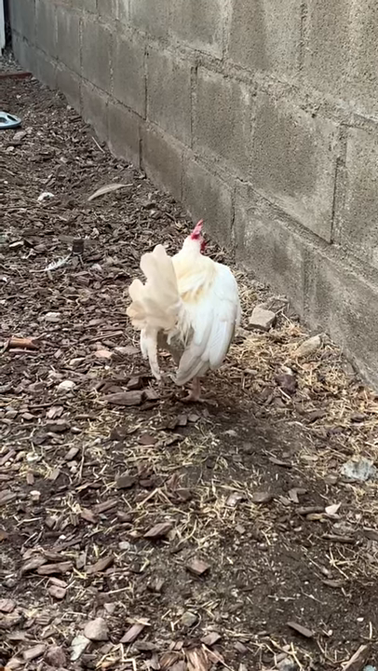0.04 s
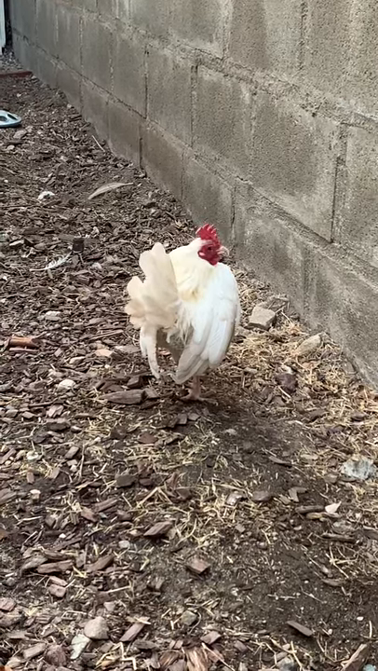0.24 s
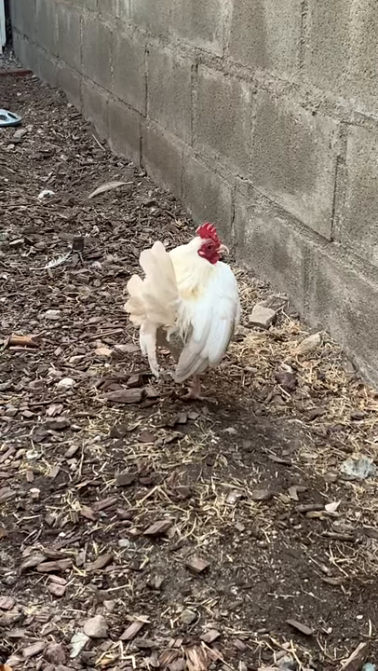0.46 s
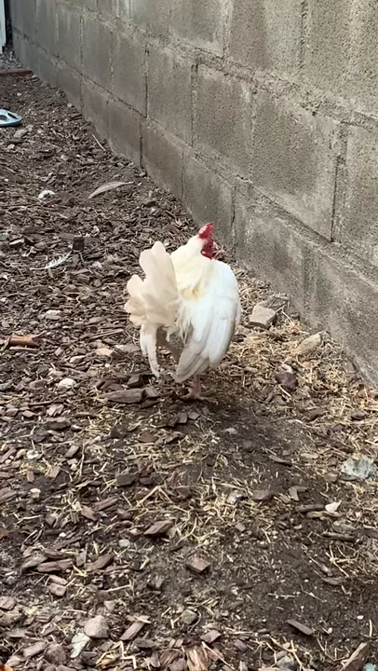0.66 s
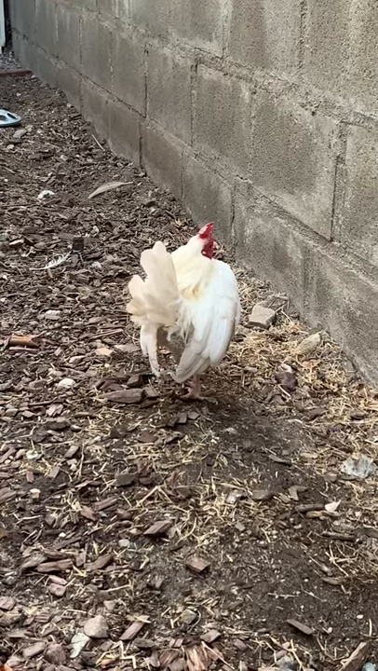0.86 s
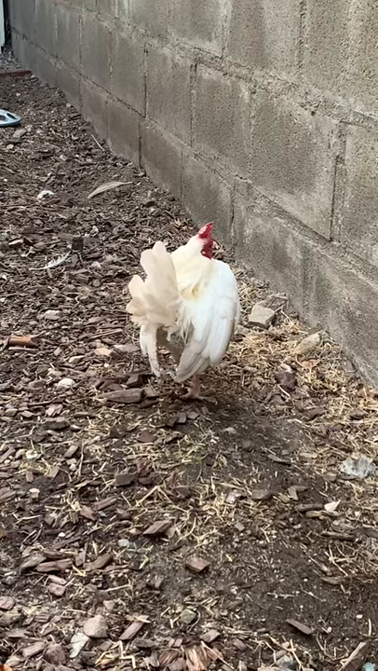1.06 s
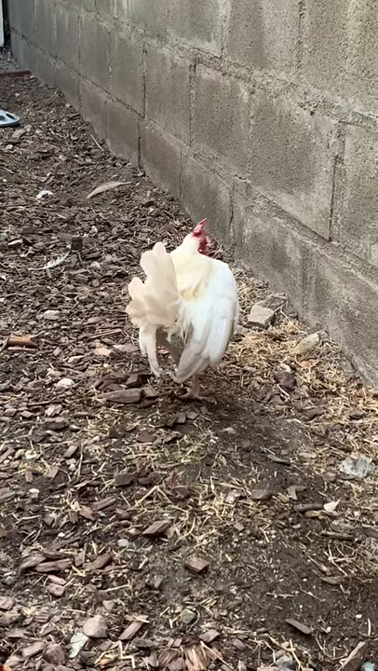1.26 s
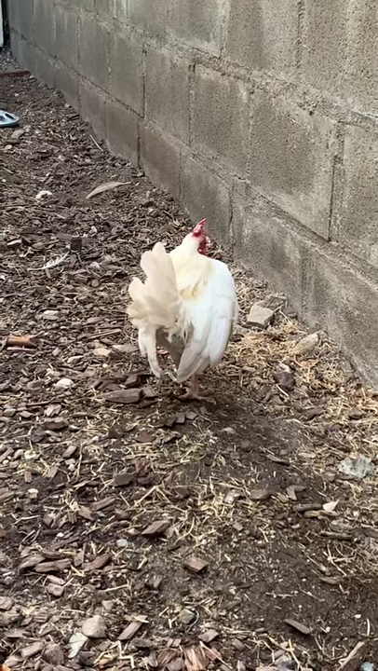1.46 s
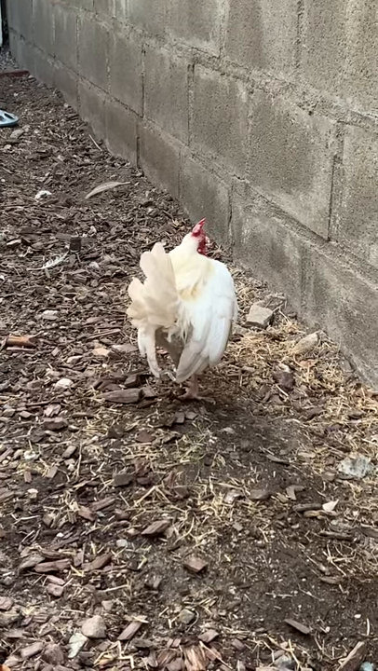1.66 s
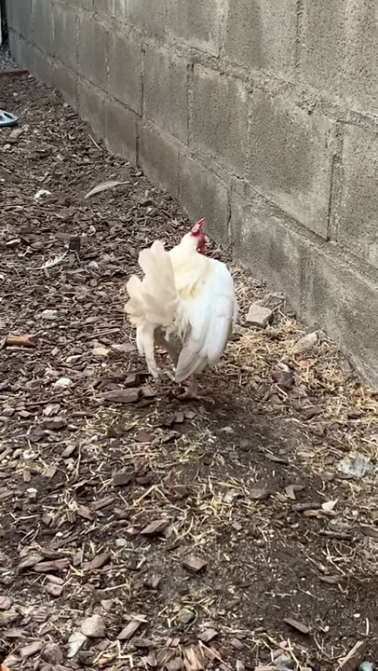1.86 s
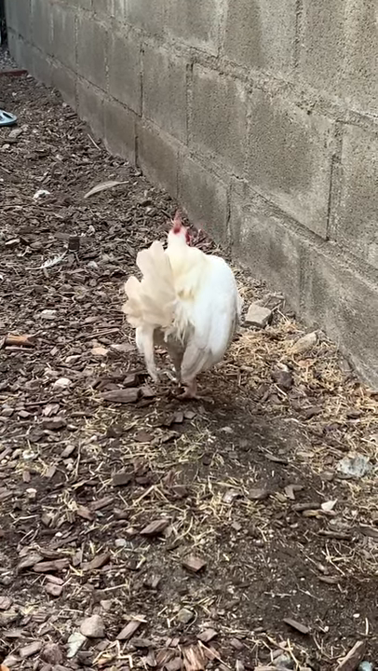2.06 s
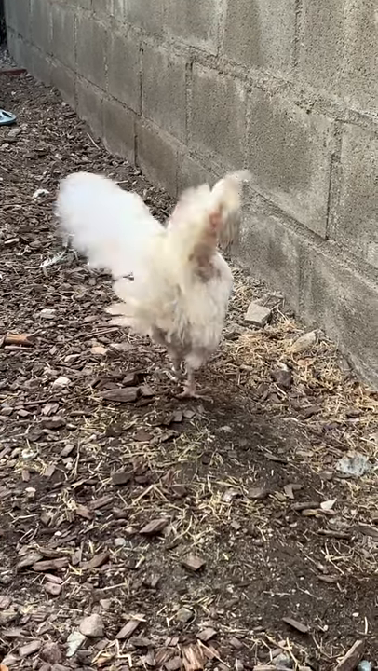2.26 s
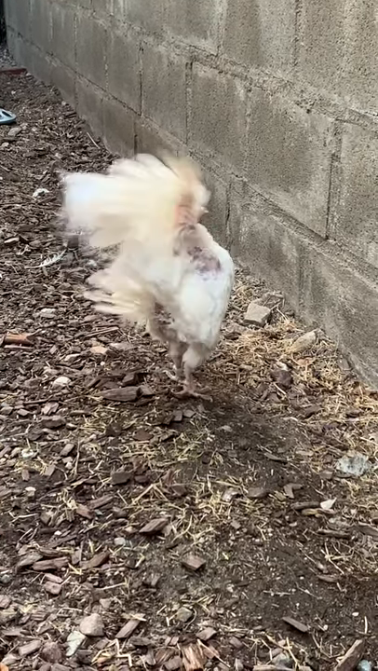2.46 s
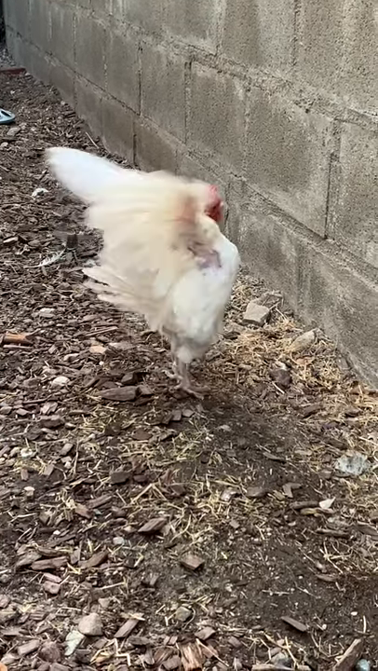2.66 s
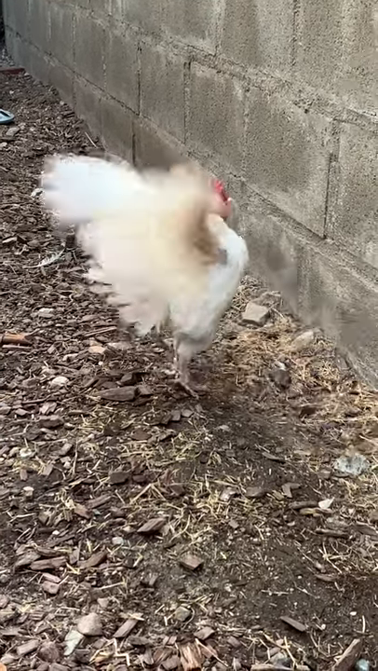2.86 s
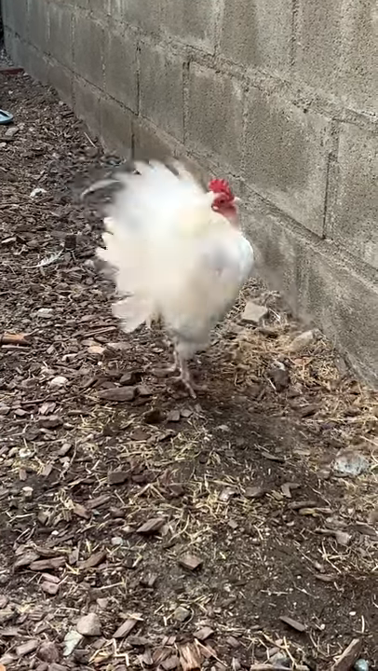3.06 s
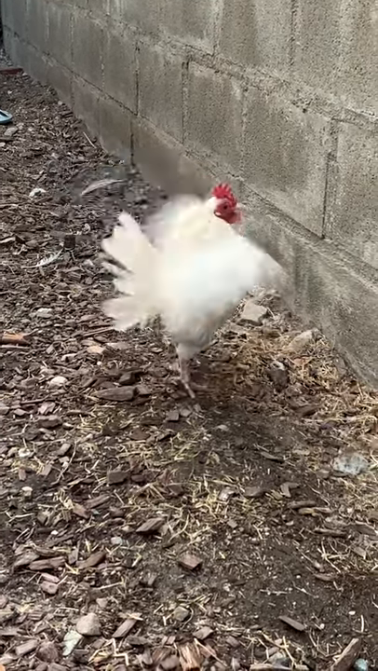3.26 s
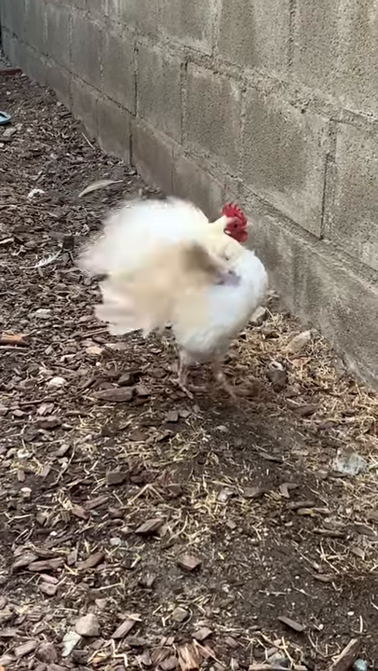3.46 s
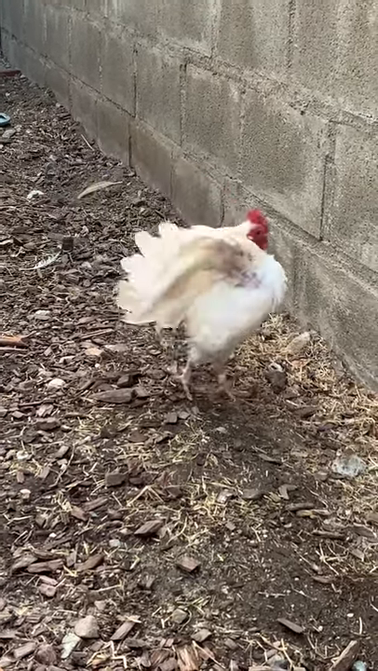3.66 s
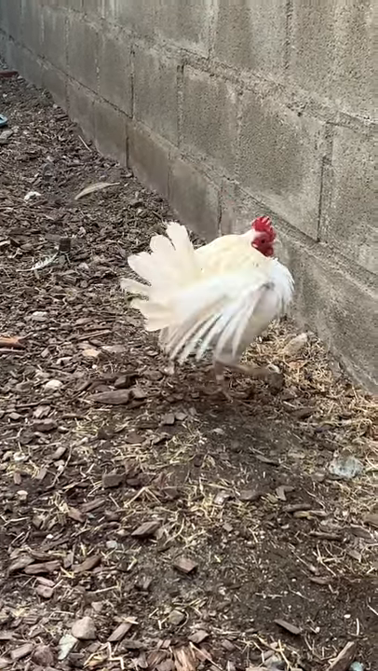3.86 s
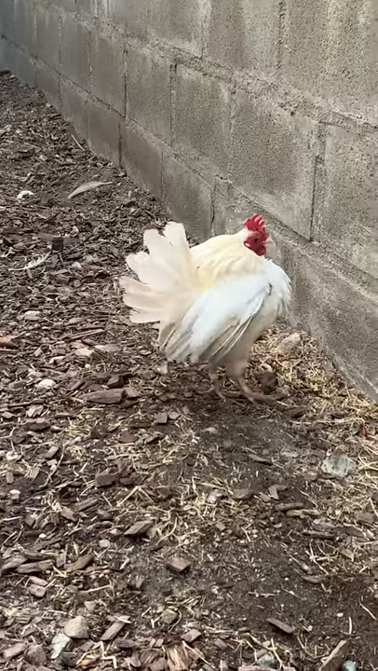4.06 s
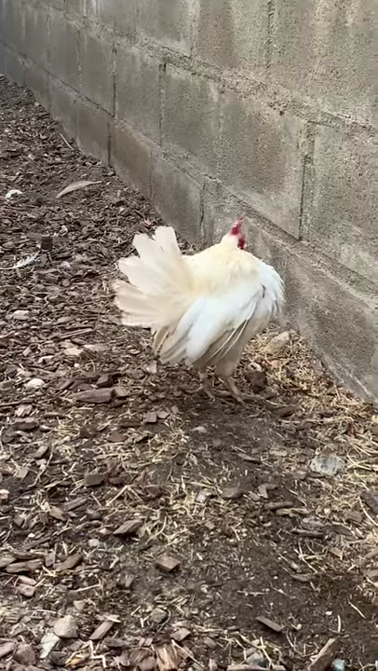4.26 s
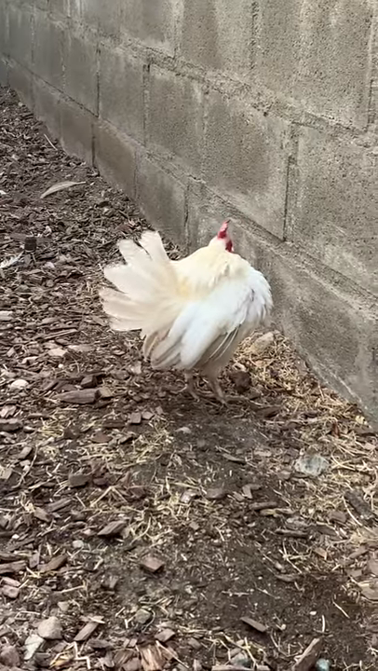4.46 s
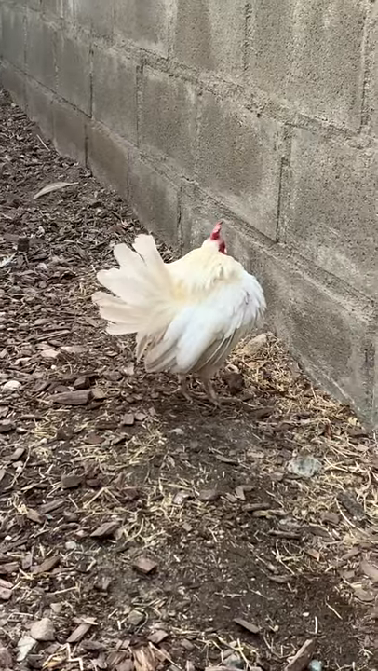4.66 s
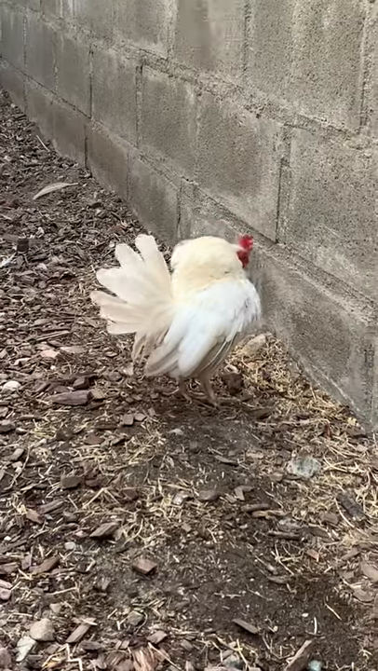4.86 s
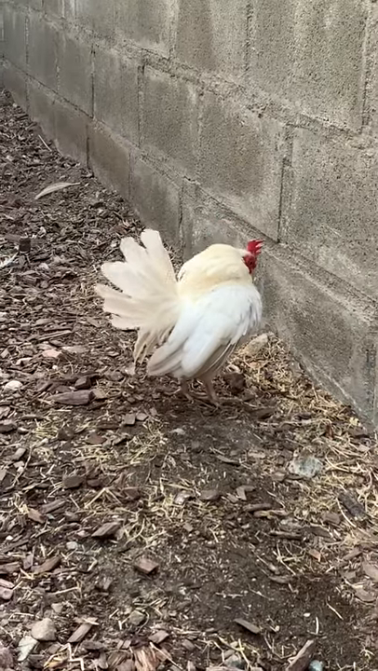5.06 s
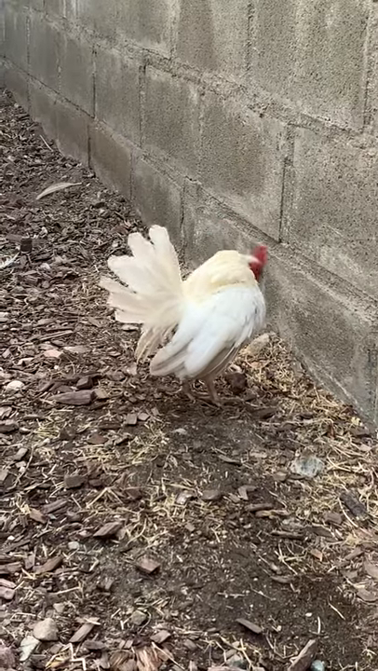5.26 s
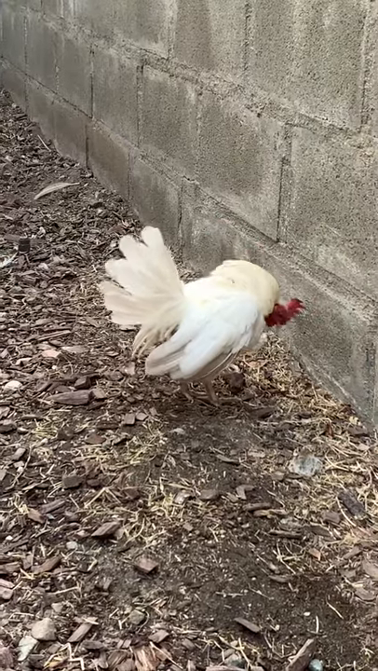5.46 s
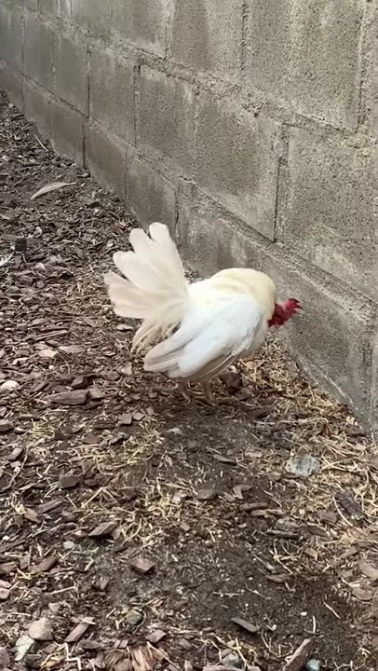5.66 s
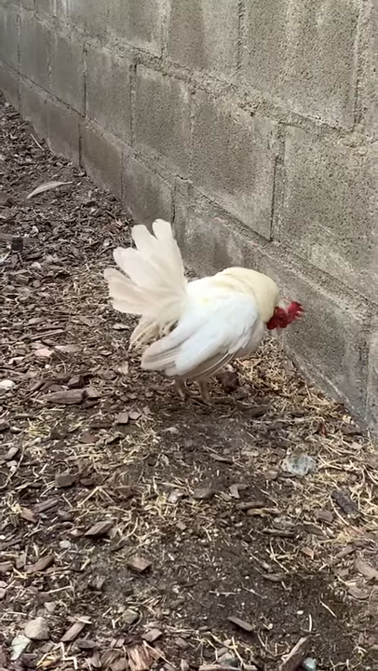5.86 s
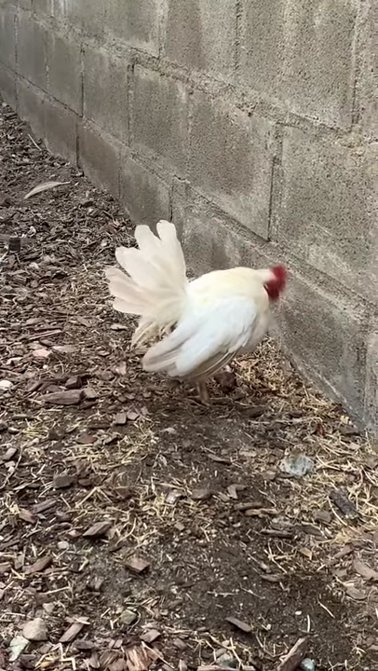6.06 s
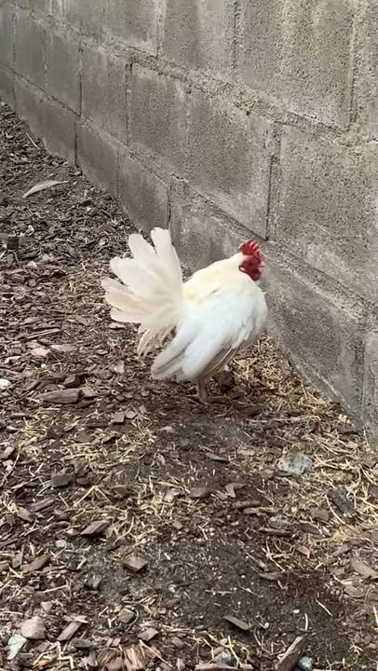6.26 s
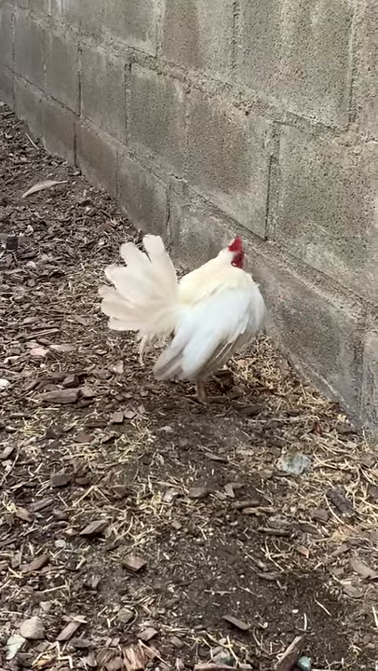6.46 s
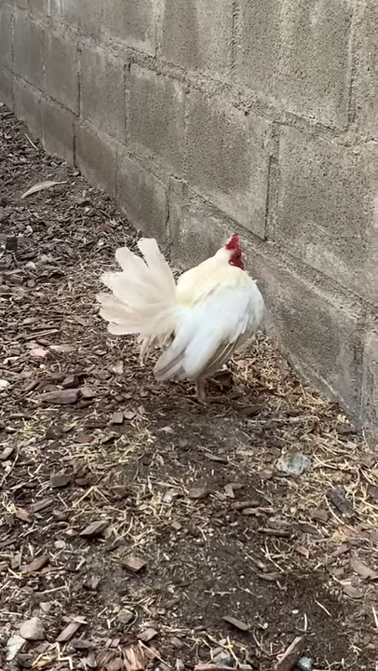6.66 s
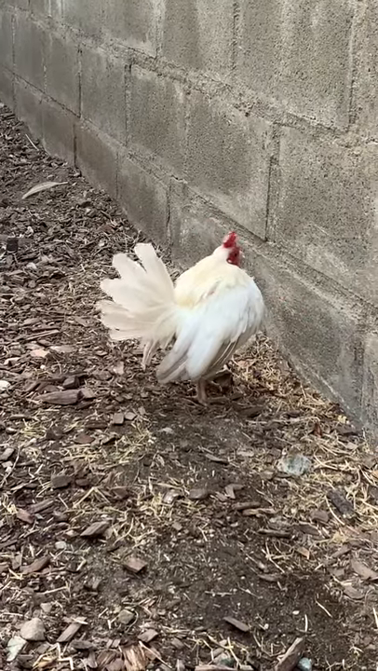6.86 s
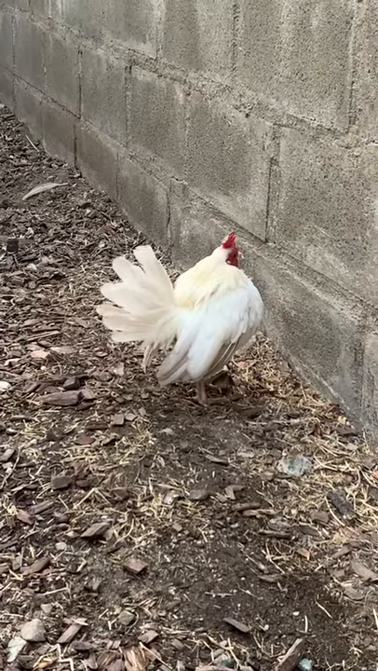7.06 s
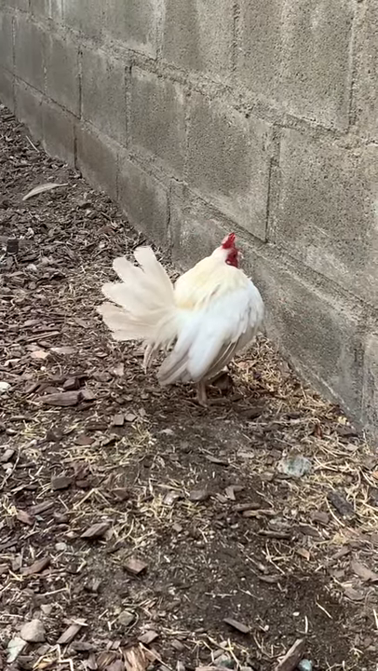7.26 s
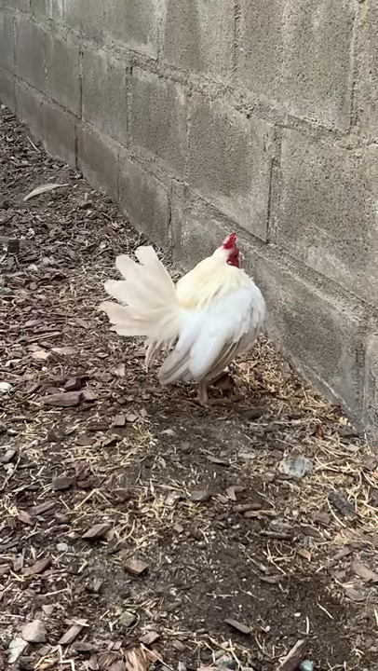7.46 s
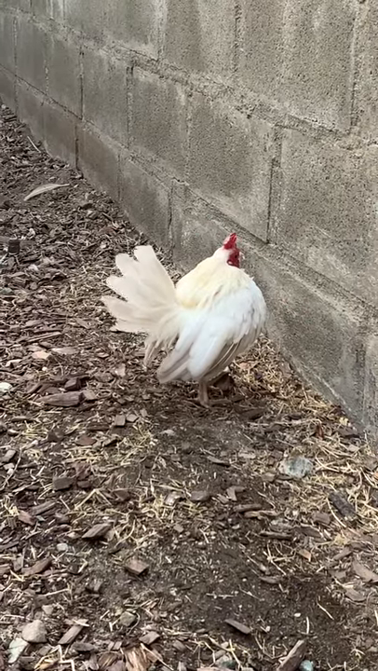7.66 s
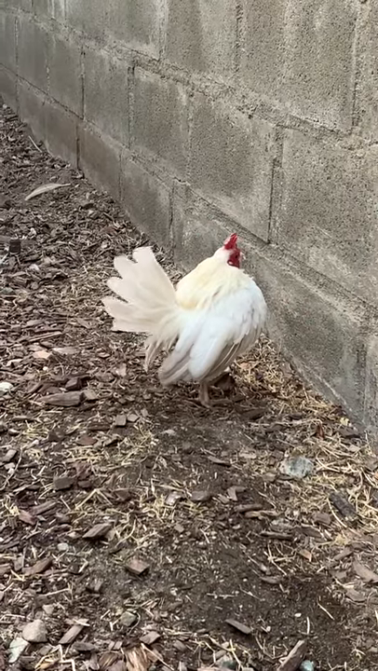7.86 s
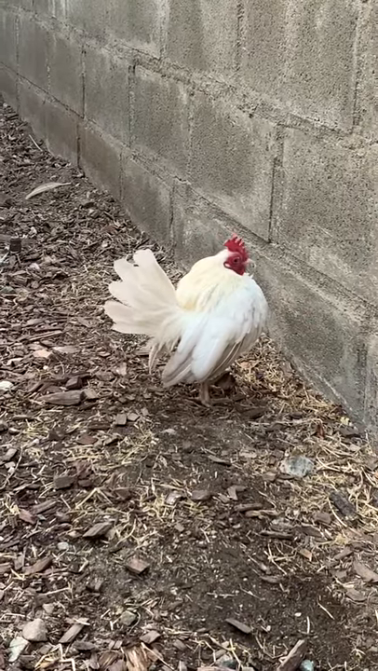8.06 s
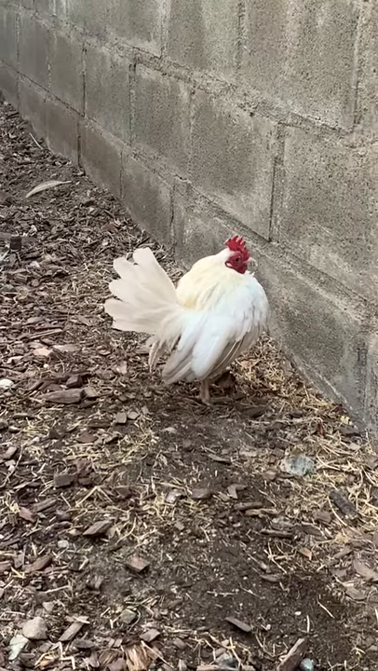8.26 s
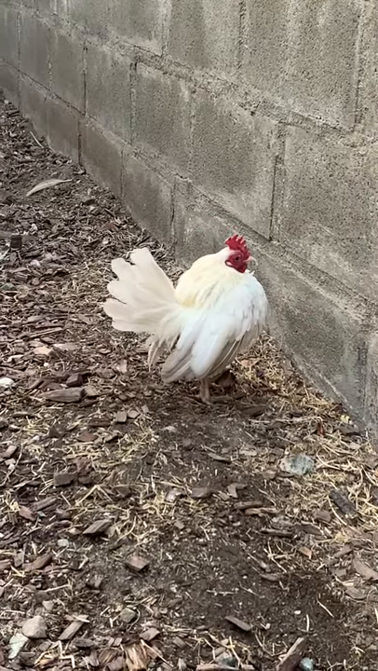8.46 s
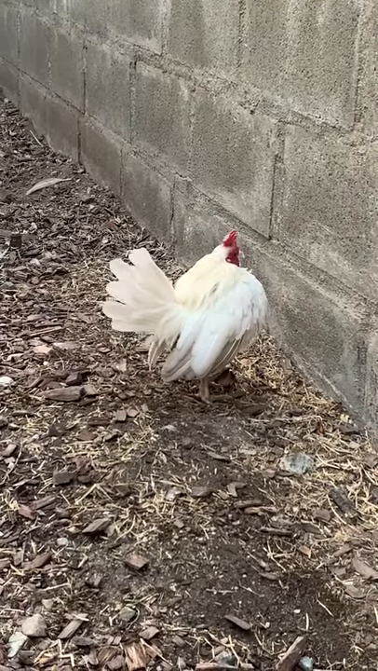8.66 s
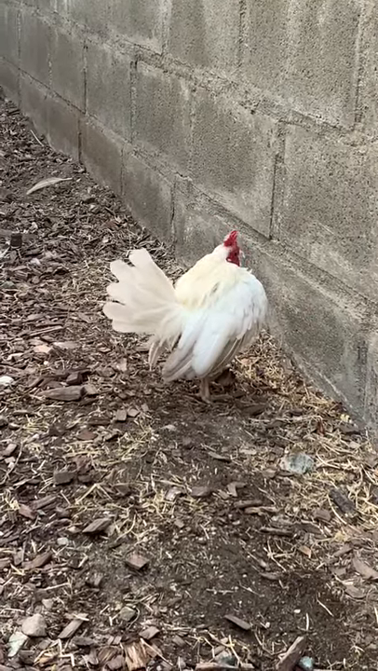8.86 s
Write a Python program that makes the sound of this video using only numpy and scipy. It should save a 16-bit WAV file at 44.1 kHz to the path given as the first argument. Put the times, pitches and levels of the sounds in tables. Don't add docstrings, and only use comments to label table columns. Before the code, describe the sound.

Steady distant town noise and thin hiss lie under sparse high bird whistles, with a far engine fading out early. A close rooster gives one rapid burst of five wing beats, dry and snapping with soft air thumps, then rustles into silence. Later come three low, brief throaty clucks, with small birds chirping more clearly towards the end. Captured on a phone in a small, dry walled yard.

```python
import sys
import numpy as np
from scipy import signal
from scipy.fft import rfft, irfft, next_fast_len
from scipy.io import wavfile
from scipy.ndimage import uniform_filter1d, map_coordinates

SR = 44100
rng = np.random.default_rng(int(sys.argv[2]) if len(sys.argv) > 2 else 0)


def boost_factor(decibels):
    exponent = np.asarray(decibels, float) / 20
    return 10 ** exponent


def unload_audio(sound):
    columns = np.transpose(np.atleast_2d(sound))
    steps = np.round(np.clip(columns, -1, 1) * 32767)
    wavfile.write(sys.argv[1], SR, steps.astype(np.int16))


N = 392931
TIME = np.arange(N) / SR


def unit(x):
    return x / np.sqrt(np.mean(x ** 2) + 1e-20)


def along(points, hz):
    f, v = np.transpose(points)
    return np.interp(np.log(hz + 1), np.log(f + 1), v)


def shade(spectrum, hz):
    return boost_factor(along([(1, -120)] + list(spectrum) + [(SR / 2, -120)], hz))


def filtered(x, response):
    m = next_fast_len(N + 8192)
    return irfft(rfft(x, m) * response(np.fft.rfftfreq(m, 1 / SR)), m)[..., :N]


def noise(spectrum):
    return unit(filtered(rng.standard_normal(N), lambda hz: shade(spectrum, hz)))


def wobble(rate):
    knots, coarse = rng.standard_normal(N // 16), TIME[::8]
    return np.interp(TIME, coarse, map_coordinates(knots, [coarse * rate]))


def around(s, before, after):
    span = slice(round((s - before) * SR), round((s + after) * SR))
    return span, TIME[span] - s


def delayed(x, seconds):
    return np.pad(x, (round(seconds * SR), 0))[:N]


def swells(rows):
    power = np.zeros(N)
    for s, db, rise, fall in rows:
        span, t = around(s, rise, fall)
        power[span] += boost_factor(db - 60 * np.where(t < 0, -t / rise, t / fall)) ** 2
    return np.sqrt(power)


# f/Hz, correlation
PORT_LIKENESS = [(40, 1), (90, 1), (200, 0.881), (400, 0.43), (700, 0.72), (1500, 0.26), (3000, 0.68),
                 (6000, 0.49), (8500, 0.93), (10200, 0.59), (11800, 0.67), (13200, 0.97), (14200, .6),
                 (15500, .9)]


def diffuse(spectrum, patchy_db, size=512):
    hz = np.fft.rfftfreq(size, 1 / SR)
    real, imag, field = rng.standard_normal((3, 2, len(hz), 2 * N // size + 3))
    field = uniform_filter1d(field[0], size=4, axis=0)
    field = uniform_filter1d(field, size=16, axis=1)
    turn = np.arccos(np.clip(along(PORT_LIKENESS, hz), -1, 1)) / 2
    shares = (shade(spectrum, hz) * [np.cos(turn), np.sin(turn)])[..., None]
    cells = (real + 1j * imag) * shares * boost_factor(patchy_db * unit(field))
    mid, side = signal.istft(cells, nperseg=size)[1][:, :N]
    return unit(np.array([mid + side, mid - side]))


# f/Hz, level/dB
PORT_TILT = [(60, -1), (250, -2.5), (450, -2.5), (800, 0.5), (1400, 0), (2500, -0.7), (4500, 1),
             (15000, -0.06)]


def ports(pair, lead):
    def half(hz):
        return np.exp(.5j * along(lead, hz)) * boost_factor(along(PORT_TILT, hz) / 2)
    return filtered(pair, lambda hz: np.array([half(hz), 1 / half(hz)]))


# f/Hz, t60/s
YARD_T60 = [(200, 0.096), (700, 0.1), (3000, 0.084), (12000, 0.1225)]


def yard(x, wet_db, spread, lasting=1):
    hz, t, z = signal.stft(rng.standard_normal((2, SR // 3)), SR, nperseg=256)
    decay = boost_factor(-60 * t / lasting / along(YARD_T60, hz)[:, None])
    shared, own = signal.istft(z * decay, SR, nperseg=256)[1]
    tails = np.array([shared + spread * own, shared - spread * own]) / np.linalg.norm(shared)
    return x + boost_factor(wet_db) * signal.oaconvolve(delayed(x, .004)[None], tails, axes=1)[:, :N]


def calls(notes, overtones_db, rough, start, top_at, sag_hz_per_s, peak, swell, bend=0):
    out = np.zeros(N)
    flutter_db = 4 * rough * wobble(190)
    quaver = 1 + .026 * rough * wobble(230)
    for s, length, turn_hz, db, *bright_db in notes:
        span, t = around(s, 0, length)
        u = np.clip(t / length, 0, 1)
        glide = 1 + (start - 1) * (1 - u / top_at).clip(0) ** 2
        onset = ((u - top_at).clip(0) / (1 - top_at)) ** bend
        hz = turn_hz * glide - sag_hz_per_s * (t - top_at * length).clip(0) * onset
        turn = 2 * np.pi * np.cumsum(hz * quaver[span]) / SR
        tone = np.sin(turn)
        for k, level in enumerate(overtones_db):
            tone += boost_factor(level + sum(bright_db)) * np.sin((k + 2) * turn)
        envelope = np.abs(np.sin(np.pi * u ** peak)) ** swell
        out[span] += boost_factor(db + 4.5 + flutter_db[span]) * envelope * tone
    return out


def leaving():
    gone_s, fade_s = 0.95, 0.25
    return np.clip((gone_s - TIME) / fade_s, 0, 1)


# t/s, level/dB
TRAFFIC = [
    (0.0, -50.5),
    (0.05, -47),
    (0.17, -47.5),
    (2.71, -45),
    (5.51, -48),
    (5.58, -45.5),
    (8.46, -48),
    (8.91, -46.5),
]
# t/s, level/dB, half length/s
CHATTER = [
    (1.366, 8, 0.082),
    (5.2, -2, 0.2),
    (5.504, 4, .15),
    (6.898, 7, 0.42),
    (7.812, 15, 0.35),
    (8.506, 12.5, 0.16),
]
# f/Hz, level/dB per Hz
RUMBLE = [(22, -42), (35, -17), (46, 1), (56, -2.5), (70, -2.5), (110, -8), (160, -22), (250, -27.5),
          (400, -38.5)]
DRONE = [(90, -30.5), (160, -0.5), (250, -7), (400, -15), (600, -29.5)]
ROAD = [(300, -32.5), (500, -3), (850, 1), (1300, -7.5), (1700, -15), (2200, -27), (3000, -32), (4500, -41)]
FLOCK = [(1400, -20), (1900, 4), (2400, -1.5), (3000, -16.5), (4000, -31.5)]
AIR = [(1500, -18.5), (2800, -0.5), (4000, 0.5), (6500, -4.5), (9000, -2), (12000, -3.5), (14500, -4),
       (15500, -12), (16200, -41.5)]


def town():
    traffic_db = np.interp(TIME, *np.transpose(TRAFFIC))
    chatter_db = sum(db * np.exp(-((TIME - s) / half) ** 2) for s, db, half in CHATTER)
    drone_db = -67 + 0.5 * (traffic_db - traffic_db.mean()) + 8.5 * leaving()
    rumble = boost_factor(traffic_db + 1.0 + 0.63 * wobble(3)) * diffuse(RUMBLE, patchy_db=0.84, size=8192)
    drone = boost_factor(drone_db) * diffuse(DRONE, patchy_db=0.0, size=1024)
    road = boost_factor(-65 + 0.17 * chatter_db + 1.1 * wobble(2.2)) * diffuse(ROAD, patchy_db=2.8, size=1024)
    flock = boost_factor(-86.5 + chatter_db + 1.57 * wobble(5.3)) * diffuse(FLOCK, patchy_db=5.5)
    hiss = boost_factor(-81.5 + 0.45 * wobble(1.22)) * diffuse(AIR, patchy_db=1.0)
    return rumble + drone + road + flock + hiss


# multiple of the firing rate, level/dB
ENGINE_ORDERS = [
    (2, -67),
    (3, -66.5),
    (5, -67),
]


def engine():
    turn = 2 * np.pi * np.cumsum(108.5 * (1 + 0.03 * wobble(30))) / SR
    return leaving() * sum(boost_factor(db + 3.9 * wobble(14.9)) * np.sin(k * turn) for k, db in ENGINE_ORDERS)


# t/s, length/s, f/Hz, level/dB
WHINES = [
    (3.71, 0.21, 854, -79),
    (4.98, 0.1, 843, -75.5),
    (5.0, 0.14, 2040, -83.5),
    (6.26, 0.51, 841, -78),
    (8.7, 0.024, 1038, -69.5),
]


def tyres():
    return calls(WHINES, [], rough=2, start=0.98, top_at=0.31, sag_hz_per_s=30, peak=0.8, swell=0.7)


# t/s, length/s, turning f/Hz, level/dB
DROPS = [
    (4.752, 0.04, 3810, -79),
    (4.89, 0.053, 3610, -79),
    (5.04, 0.031, 3400, -79.5),
]
DISTANT = [
    (.01, 0.02, 3110, -78),
    (.24, 0.088, 3200, -85),
    (.365, 0.055, 3300, -81),
    (.465, 0.057, 3180, -82),
    (.58, 0.057, 3090, -80),
    (2.035, 0.019, 3230, -72.5),
    (2.15, 0.038, 4190, -78.5),
]
PEEPS = [(.28, 0.058, 4260, -82.5), (.81, 0.055, 4240, -83), (1.68, .07, 4380, -91),
         (1.825, 0.066, 4320, -77.5), (1.97, 0.12, 4400, -80), (2.19, 0.13, 4310, -76.5),
         (7.485, 0.041, 4250, -78), (7.53, 0.078, 4120, -86), (7.685, .075, 4350, -82),
         (7.85, 0.057, 4300, -80.5), (7.94, .04, 4236, -80), (8.0, 0.041, 4190, -73),
         (8.165, 0.038, 4260, -79)]
COOS = [(.23, 0.19, 2580, -84), (.62, 0.099, 2030, -84), (3.475, 0.035, 2820, -71.5),
        (3.705, 0.045, 2307, -75), (4.255, 0.083, 3400, -84), (5.054, .026, 2680, -72),
        (6.622, 0.021, 2990, -78.5), (7.565, 0.04, 1800, -63.5), (7.625, 0.039, 2086, -61),
        (7.91, 0.096, 3430, -77.5), (8.015, 0.034, 3810, -75)]


def far_birds():
    drops = calls(DROPS, [-30], rough=0.7, start=0.9, top_at=.05, sag_hz_per_s=23600, peak=0.69, swell=0.69)
    distant = calls(DISTANT, [-30], rough=0.9, start=.95, top_at=.25, sag_hz_per_s=6000, peak=0.95, swell=0.82)
    peeps = calls(PEEPS, [-30], rough=.8, start=1.01, top_at=.3, sag_hz_per_s=4500, peak=.7, swell=.6)
    coos = calls(COOS, [-30], rough=1.1, start=.98, top_at=.4, sag_hz_per_s=1200, peak=.8, swell=.6)
    return drops + distant + peeps + coos


# t/s, length/s, turning f/Hz, level/dB; chirps and dives add overtone level/dB
CHIRPS = [
    (1.308, 0.065, 3934, -65.5, -8),
    (1.179, 0.096, 3495, -68, -12),
    (6.667, 0.076, 2768, -59.5, 10.5),
    (6.799, 0.072, 3140, -56.5, 4.5),
    (6.956, 0.094, 3020, -57.5, -3),
    (8.345, 0.068, 3344, -55, 4),
]
DIVES = [
    (1.451, 0.077, 3780, -62, 0),
    (8.484, 0.082, 3687, -57, -5),
]
BUZZES = [
    (1.178, 0.082, 2640, -73),
    (1.325, 0.042, 2590, -72),
    (1.5, 0.043, 2584, -70),
    (8.03, 0.055, 2850, -67.5),
]
HEDGE = [
    (5.31, .08, 2830, -67),
    (5.52, .066, 2974, -67.5),
]
SWOOPS = [
    (5.255, 0.051, 2530, -64),
    (5.472, 0.051, 2564, -64.5),
]


def sparrows():
    chirps = calls(CHIRPS, [-26], rough=1.15, start=.8, top_at=0.331, sag_hz_per_s=20000, peak=0.61,
                   swell=1.6, bend=0.72)
    dives = calls(DIVES, [-26], rough=0.94, start=.78, top_at=.28, sag_hz_per_s=20000, peak=.7,
                  swell=1.05, bend=.15)
    lower = [(s, length, .86 * hz, db - 13.5) for s, length, hz, db, _ in CHIRPS + DIVES]
    seconds = calls(lower, [], rough=1.76, start=.9, top_at=0.4, sag_hz_per_s=7600, peak=0.24, swell=0.9)
    buzzes = calls(BUZZES, [-38], rough=1.14, start=.84, top_at=0.364, sag_hz_per_s=3100, peak=0.62, swell=0.98)
    hedge = calls(HEDGE, [-30], rough=1.1, start=0.58, top_at=0.42, sag_hz_per_s=17000, peak=0.8,
                  swell=.4, bend=.4)
    swoops = calls(SWOOPS, [-30], rough=1.2, start=1.28, top_at=.6, sag_hz_per_s=1500, peak=1.2, swell=0.55)
    return chirps + dives + seconds + buzzes + hedge + swoops


# f/Hz, level/dB per Hz
QUILLS = [(500, -19), (1500, -7.5), (3000, -8), (4500, -1), (6500, 3), (9000, -5), (12000, -2),
          (15800, -9.5), (16500, -42)]
# t/s, peak level/dB
TICKS = [
    (0.9147, -67),
    (1.8294, -67.5),
    (2.051, -56),
    (5.2534, -65),
    (6.946, -51),
    (6.9611, -56),
    (8.5045, -63.5),
]


def litter():
    decay = np.zeros(N)
    for s, db in TICKS:
        span, t = around(s, 0, .04)
        decay[span] += boost_factor(db - 1.5 - 60 * t / 0.013)
    return decay * noise(QUILLS)


# t/s, length/s, f/Hz, level/dB, rasp over the note/dB
CLUCKS = [
    (5.419, 0.027, 563, -50, 10),
    (5.512, 0.028, 672, -36, -11),
    (5.669, .025, 668, -36.5, -10),
]
# f/Hz, level/dB per Hz
THROAT = [(300, -10), (600, 13), (1200, -18.5), (1800, -24), (3200, -29), (3800, -45.5)]
BEAK = [(2800, -16), (3400, 0.5), (4600, -2), (5200, -22)]


def clucks():
    rasp, hiss = np.zeros(N), np.zeros(N)
    for s, length, hz, db, rasp_db in CLUCKS:
        span, t = around(s, 0, length)
        hiss[span] = boost_factor(db) * np.abs(np.sin(np.pi * (t.clip(0) / length) ** 0.94))
        rasp[span] = boost_factor(rasp_db) * hiss[span]
    notes = [row[:4] for row in CLUCKS]
    hoarse = calls(notes[:1], [-16], rough=1.1, start=.86, top_at=.5, sag_hz_per_s=-5000, peak=.7, swell=.6)
    clear = calls(notes[1:], [-30, -42], rough=0.5, start=0.785, top_at=0.57, sag_hz_per_s=-2000,
                  peak=0.85, swell=0.5)
    voice = hoarse + clear + rasp * noise(THROAT) + boost_factor(-36) * hiss * noise(BEAK)
    near_wall = .35 * delayed(voice, .00798)
    far_wall = boost_factor(-14) * delayed(voice, .026)
    return voice + near_wall + far_wall


# t/s of the clap, sweep level/dB, follow-through level/dB, air thump level/dB
BEATS = [
    (2.4846, -56, -56, -50),
    (2.654, -57, -44.5, -42.5),
    (2.831, -46.5, -47.5, -42.5),
    (3.004, -48.5, -38, -41.5),
    (3.193, -51, -54, -42.5),
]
# t/s from the clap, level/dB, rise and fall/s per 60 dB (negative rise: starts late)
LIFT = (0.07, -21, 0.3, 0.35)
SWEEP = (-0.014, -3, 0.11, 0.17)
FOLLOW = (.018, 0, 0.2, 0.14)
RECOVER = (-0.11, -23, -0.73, 1.5)
SHOVE = (-0.02, -8.5, 0.17, 0.08)
PUFF = (0.0012, 0.042, .1, 0.18)
# t/s, level/dB, fall/s per 60 dB
RUFFLES = [(2.055, -77.5, 0.14), (2.27, -72, 0.12), (2.305, -67, 0.28), (3.25, -70.5, 0.5),
           (2.46, -62, 0.17), (3.332, -67, 0), (3.409, -67.5, 0.65), (3.55, -78.5, 1), (3.9, -82.5, 1),
           (4.0, -84, -0.6), (6.96, -86, 1.5), (8.02, -79, 0.3)]


def strokes():
    def at(s, db, phase):
        return (s + phase[0], db + phase[1], *phase[2:])
    swish, thump, wake = [], [], []
    for s, sweep_db, follow_db, thump_db in BEATS:
        swish += [at(s, sweep_db, LIFT), at(s, sweep_db, SWEEP)]
        swish += [at(s, follow_db, FOLLOW), at(s, follow_db, RECOVER)]
        thump += [at(s, thump_db, SHOVE), at(s, thump_db, PUFF)]
        wake.append((s, thump_db - 18.5, 0.23, 1.1))
    swish += [(s, db, 0.86 * fall, fall) for s, db, fall in RUFFLES]
    return swells(swish), swells(thump), swells(wake)


# f/Hz, level/dB per Hz
WAKE = [(250, -21), (420, -4.5), (900, -8.5), (2000, -6.5), (3000, -13), (4500, -30.5)]


def stirred_air(wake):
    return wake * diffuse(WAKE, patchy_db=1.0)


# t/s, peak level/dB
SNAPS = [(2.461, -45), (2.4851, -32), (2.6474, -28), (2.6497, -35), (2.6514, -26), (2.6524, -30),
         (2.6532, -26), (2.6544, -30), (2.656, -34), (2.8292, -24), (2.8303, -24), (2.8309, -16),
         (2.8316, -21), (2.8323, -27), (2.8339, -32), (3.0002, -31), (3.0038, -8), (3.0049, -8),
         (3.0057, -21), (3.0063, -24), (3.0075, -24), (3.0101, -24), (3.0352, -33), (3.1949, -33),
         (3.1955, -30), (3.1961, -30), (3.1983, -40), (2.7172, -48)]


def snaps():
    out = np.zeros(N)
    rise_s, t60_s = .0001, .001
    for (s, db), (bend, phase) in zip(SNAPS, rng.standard_normal((len(SNAPS), 2))):
        span, t = around(s, 0, .005)
        turn = 2 * np.pi * t
        ring = np.sin(turn * 8500 * (1 + 0.06 * bend))
        ring += .55 * np.sin(turn * 10000 + bend)
        ring += .4 * np.sin(turn * 12600 - phase)
        ring += .4 * np.sin(turn * 15000 + phase)
        out[span] += boost_factor(db + 10.5 - 60 * t / t60_s) * (1 - np.exp(-t.clip(0) / rise_s)) * ring
    return out


# t/s of the peak, peak level/dB, f/Hz
POPS = [(2.486, -33.5, 3700), (2.6499, -41.5, 1350), (2.6518, -35.5, 960), (2.6537, -22, 1500),
        (2.6561, -29, 1800), (2.6573, -29.5, 1000), (2.662, -36.5, 1400), (2.6496, -32, 3200),
        (2.6534, -27, 3600), (2.8293, -23.5, 3100), (2.8314, -19, 3700), (2.8318, -17, 1850),
        (2.8339, -25, 1350), (2.8331, -26, 960), (2.8389, -32.5, 1900), (3.0048, -31, 1460),
        (3.0076, -24.5, 1900), (3.0095, -30, 1400), (3.0085, -31.5, 960), (3.0047, -26, 4250),
        (3.0071, -21, 3950), (3.0092, -30, 4300), (3.1957, -21.5, 3450), (3.1973, -28.5, 1400),
        (3.1992, -32.5, 1350)]


def pops():
    out = np.zeros(N)
    for s, db, hz in POPS:
        rise = .9 / hz
        span, t = around(s - rise, 0, .01)
        u = t.clip(0) / rise
        out[span] += boost_factor(db + 1) * u ** 2 * np.exp(2 - 2 * u) * np.sin(2 * np.pi * hz * t)
    return out


# t/s, feather crack level/dB, cupped air level/dB, cup f/Hz, length/s
CLAPS = [
    (2.484, -42.5, -43.5, 1870, 0.0041),
    (2.6458, -40, -34.5, 1310, 0.0074),
    (2.8268, -38, -29, 1760, 0.0063),
    (3.002, -30.5, -37, 990, 0.0078),
    (3.1947, -59, -43.5, 1330, 0.0037),
    (3.195, -58, -32, 3200, 0.0014),
]
# f/Hz, level/dB per Hz
FEATHERS = [(300, -20), (700, -0.5), (1200, -1), (1900, 5), (3200, -1), (4500, -0.5), (6500, -2),
            (9000, -7), (12000, -8.5), (15700, -14), (16200, -42)]
PUSH = [(50, -34), (120, 0), (180, -7.5), (245, 5), (330, -14.5), (500, -21.5), (700, -27)]


def wings(swish, thump):
    barbs = unit(boost_factor(3.8 * wobble(400) + 1.2 * wobble(70)))
    out = boost_factor(5.5) * swish * barbs * diffuse(FEATHERS, patchy_db=4.0, size=256)[0]
    out += boost_factor(8.5) * thump * noise(PUSH)
    crack = unit(boost_factor(4 * wobble(1500))) * noise(QUILLS)
    for s, crack_db, cup_db, cup_hz, length in CLAPS:
        span, t = around(s, 0, .06)
        u = t.clip(0) / length
        blow = 2.9 * u * np.exp(-2 * u ** 1.1)
        cup = unit(signal.lfilter(*signal.iirpeak(cup_hz, 1.1, SR), rng.standard_normal(len(t))))
        out[span] += blow * (boost_factor(crack_db + 10.5) * crack[span] + boost_factor(cup_db + 7.5) * cup)
    return out + .3 * delayed(out, 0.0021)


# f/Hz, lead/rad
LEAD_FAR = [(0, 0), (260, 0.0), (690, 2.5), (2000, 3.1), (5500, 3.3), (6200, 4.3), (7000, 5.5), (7700, 6.1),
            (9000, 6.3), (9900, 7.1), (11000, 8.8), (11700, 9.38), (13300, 9.48), (13900, 10.4),
            (14600, 11.6), (15300, 12.5)]
LEAD_BIRDS = [(500, 0.65), (1800, 1.8), (2100, 2.23), (2700, 2.34), (3100, 2.15), (3800, 1.72), (5510, 3.2),
              (7670, 7.4)]
LEAD_NEAR = [(20, 0), (270, -.15), (390, -1.2), (480, -1.3), (750, -1.5), (960, -5), (1200, -4),
             (1750, -4.6), (2100, -3.9), (3500, -4.1), (4200, -4.2), (4900, -3.25), (5600, -3.1),
             (6300, -1.8), (7000, -.8), (7700, -.3), (8400, -.2), (9500, .3), (10300, 1.3), (11000, 2.1),
             (11800, 2.8), (13000, 3.5), (13800, 4.6), (14500, 5.4), (15300, 5.7)]


def scene():
    swish, thump, wake = strokes()
    background = town() + engine() + stirred_air(wake)
    birds = yard(sparrows() + far_birds() + tyres(), wet_db=-6.5, spread=0.81, lasting=1.38)
    flapping = wings(swish, thump) + snaps() + pops() + litter()
    rooster = yard(flapping, wet_db=-12, spread=.3, lasting=.8) + clucks()
    return ports(background, LEAD_FAR) + ports(birds, LEAD_BIRDS) + ports(rooster, LEAD_NEAR)


def band_limit(x):
    return signal.sosfilt(signal.butter(12, 17020, fs=SR, output="sos"), x)


# f/Hz, level/dB
TOP = [(15900, 0), (16600, -18), (17000, -40)]


def record(dry):
    heard = filtered(dry, lambda hz: boost_factor(along(TOP, hz)))
    return band_limit(heard)


dry = scene()
out = record(dry)
unload_audio(out)
```